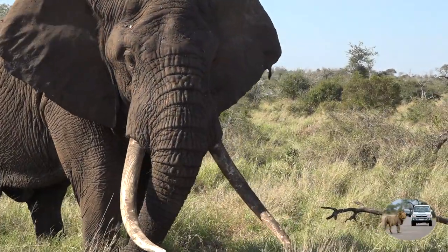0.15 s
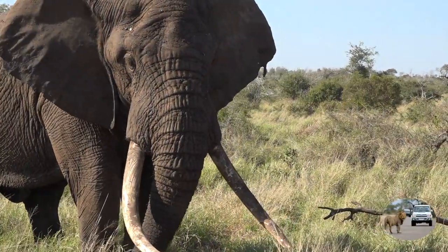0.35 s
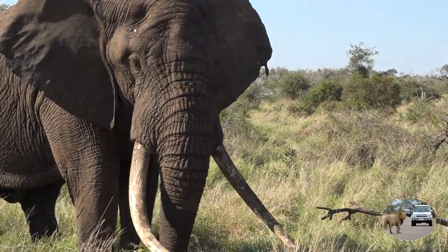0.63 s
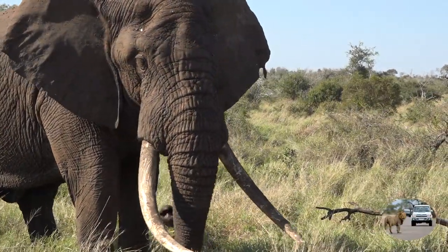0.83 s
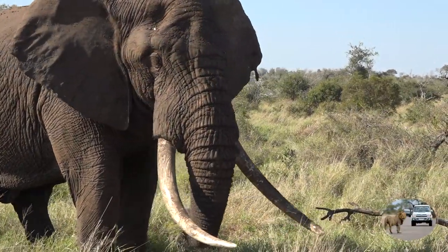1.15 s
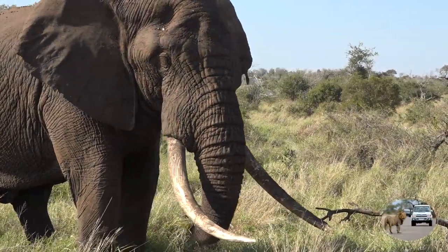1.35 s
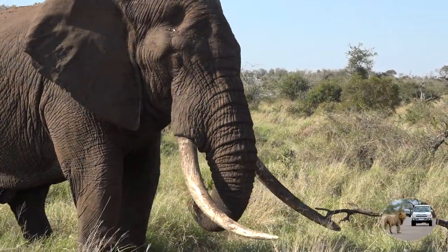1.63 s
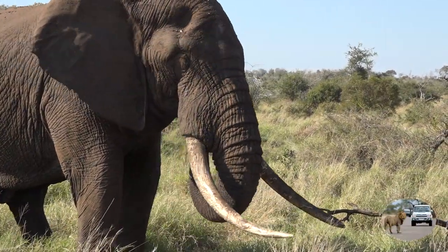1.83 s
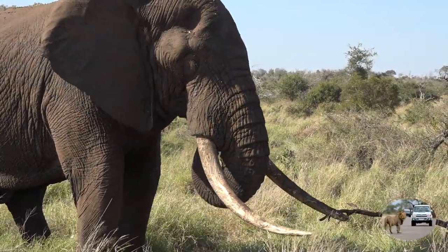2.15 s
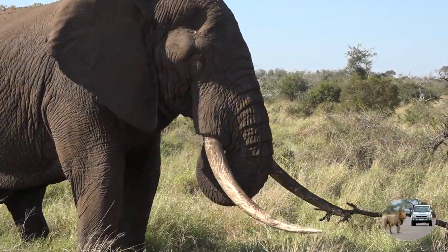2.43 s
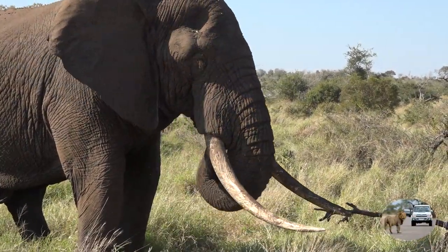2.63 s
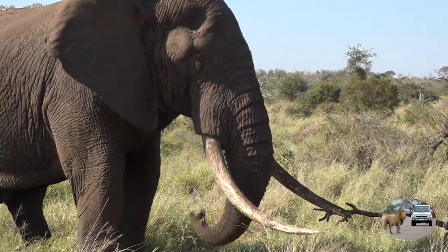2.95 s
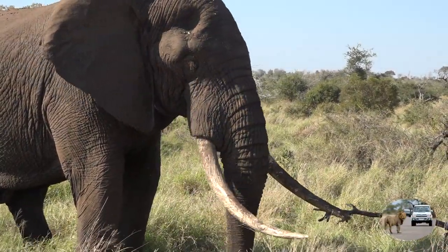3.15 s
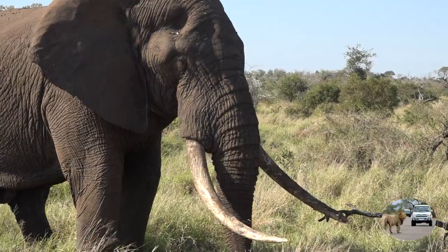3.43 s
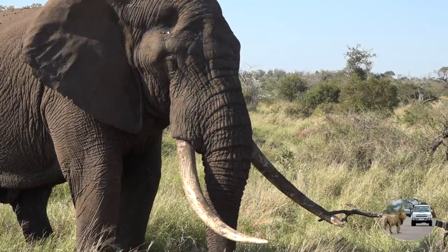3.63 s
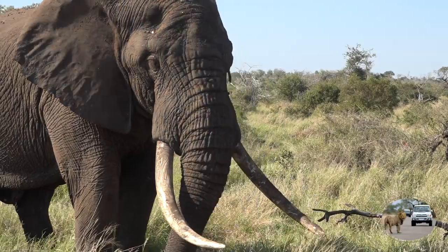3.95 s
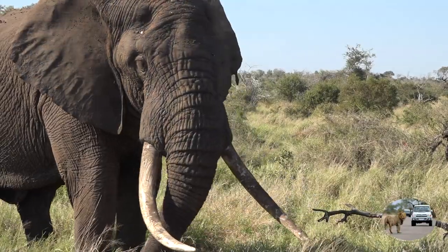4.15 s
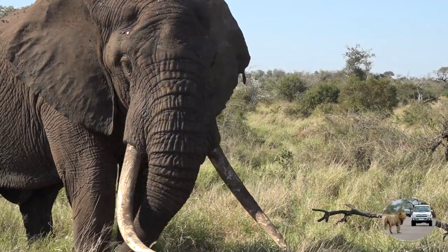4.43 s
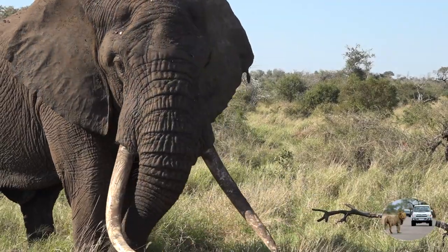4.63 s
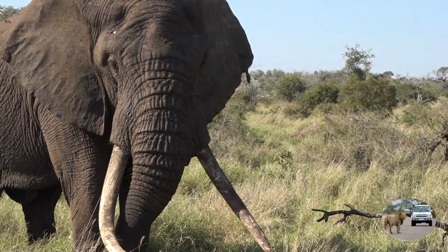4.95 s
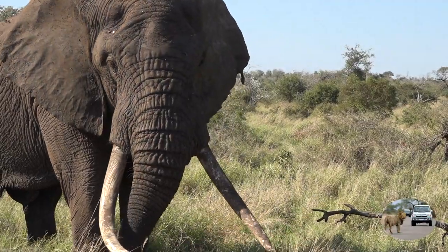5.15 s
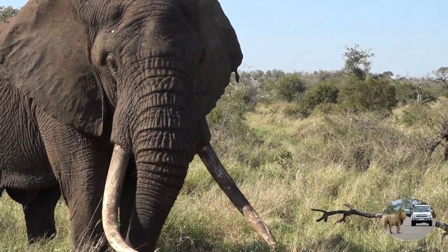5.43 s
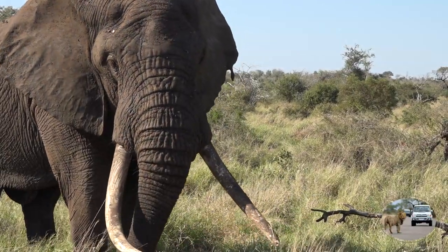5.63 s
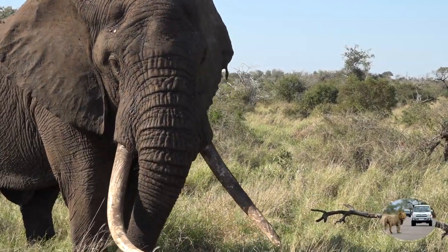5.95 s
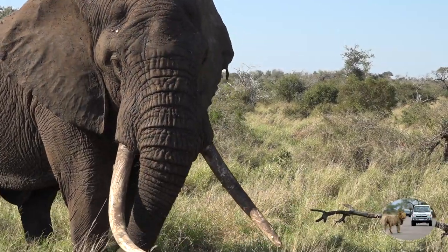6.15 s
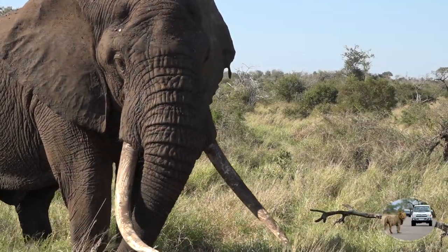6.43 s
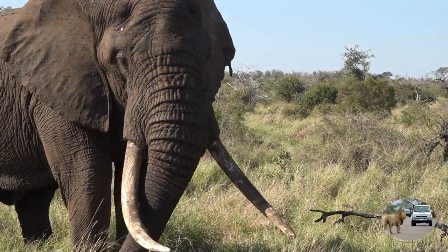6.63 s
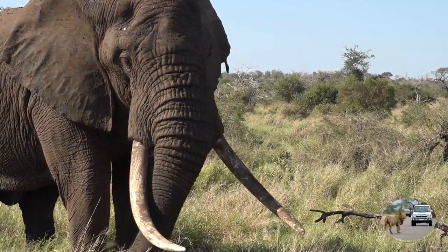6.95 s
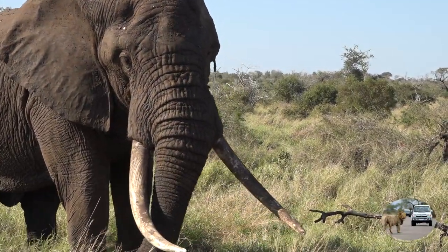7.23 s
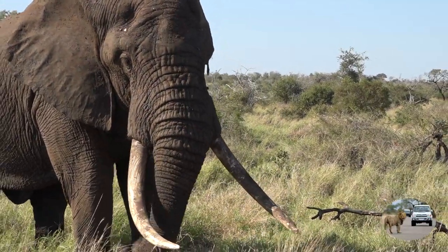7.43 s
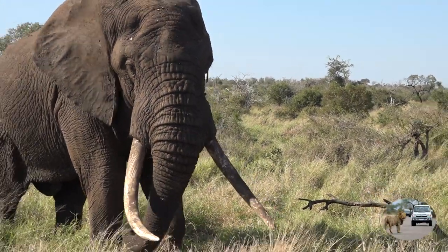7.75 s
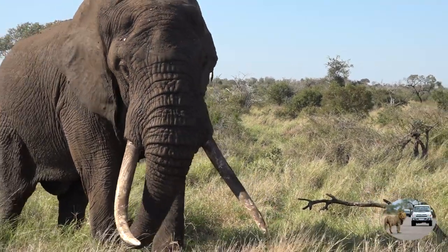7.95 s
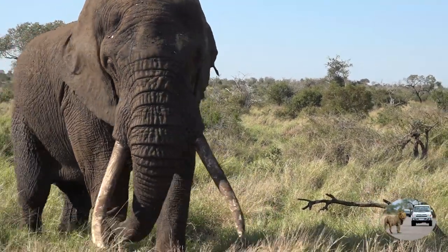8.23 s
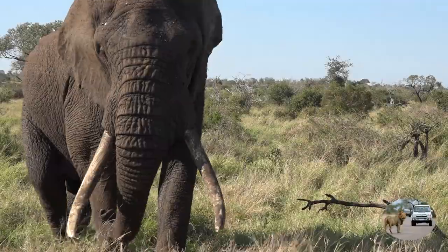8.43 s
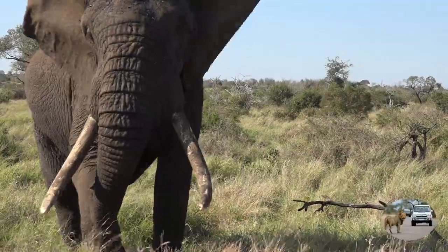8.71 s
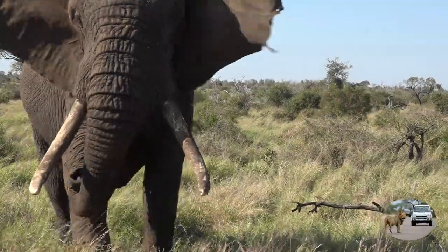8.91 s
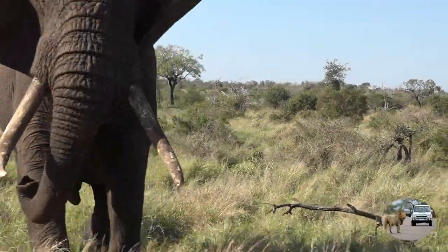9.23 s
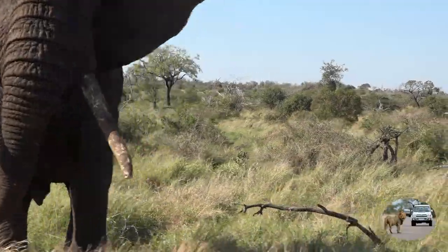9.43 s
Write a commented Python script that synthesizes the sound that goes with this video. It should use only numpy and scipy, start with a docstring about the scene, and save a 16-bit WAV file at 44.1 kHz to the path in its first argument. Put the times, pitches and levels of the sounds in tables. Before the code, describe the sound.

A vehicle's engine idles close by in open grassland with a low, uneven throb and a light metallic clatter. An elephant swishes softly through dry grass, with a few faint thuds early on. Near the end the rustling grows louder and stalks snap, then the engine revs hard, climbing in pitch with a rasping growl and low jolts as the vehicle moves off.

```python
"""Open grassland: a vehicle stands with its eight-cylinder engine idling, then revs hard to pull away.
A big animal swishes through dry grass nearby, with snapping stalks and a few thuds over a faint hiss.
The engine's uneven firings clatter in the block, growl in the exhaust pipe and boom in the body.
Under load the intake hums, a rasp opens up and the body jolts as the vehicle moves off."""
import sys
import numpy as np
from scipy import signal
from scipy.fft import rfft, irfft, next_fast_len
from scipy.io import wavfile

SR = 44100
rng = np.random.default_rng(int(sys.argv[2]) if len(sys.argv) > 2 else 0)


def waveform_to_disk(signal):
    """Save audio, clipped to [-1, 1], as 16-bit WAV at the path in sys.argv[1]."""
    frames = np.transpose(np.atleast_2d(signal))
    scaled = np.clip(frames, -1, 1) * 32767
    samples = np.round(scaled).astype(np.int16)
    wavfile.write(sys.argv[1], SR, samples)


N = 422478


def from_db(db):
    """Decibels to gain."""
    return 10 ** (np.asarray(db) / 20)


def rms_one(x):
    """Normalise to rms 1."""
    return x / np.sqrt(np.mean(x ** 2) + 1e-20)


def automation(rows):
    """One curve for each column after the time, one value a sample."""
    times, *columns = np.transpose(rows)
    return [np.interp(np.arange(N) / SR, times, column) for column in columns]


def ride(fader, load_db):
    """Level in dB of a fader (idle level [dB], load share) that rides the engine load."""
    idle_db, share = fader
    return idle_db + share * load_db


def swells(rows):
    """Envelope of swells (time [s], peak [dB], 20 dB rise [s], 20 dB fall [s]), added as powers."""
    t = np.arange(0, N + 64, 64) / SR
    power = sum(from_db(db - 20 * np.maximum((s - t) / rise, (t - s) / fall)) ** 2
                for s, db, rise, fall in rows)
    return np.interp(np.arange(N) / SR, t, np.sqrt(power))


def resonance(x, hz, width_hz):
    """Two-pole band-pass with gain 1 at its peak."""
    r = np.exp(-np.pi * width_hz / SR)
    poles = [1, -2 * r * np.cos(2 * np.pi * hz / SR), r * r]
    return signal.lfilter([(1 - r * r) / 2, 0, (r * r - 1) / 2], poles, x + 1e-18)


def steep_resonance(x, hz, width_hz):
    """Two band-pass stages in series, each width_hz wide."""
    return resonance(resonance(x, hz, width_hz), hz, width_hz)


# stereo image of grass and block: (frequency [Hz], left-right likeness [0..1])
STEREO_LIKENESS = [(200, 1), (1400, 1), (3100, 0.82), (6800, 0.93), (15000, 0.81)]

def coloured(mid_side, eq, low_hz=10, high_hz=20000):
    """EQ and band-limit a mid/side pair, then spread it to left and right at rms 1."""
    size = next_fast_len(N)
    hz = np.maximum(np.fft.rfftfreq(size, 1 / SR), 1)

    def curve(points):
        point_hz, values = np.transpose(points)
        return np.interp(np.log(hz), np.log(point_hz), values)

    gain = from_db(curve(eq)) / np.sqrt((1 + (low_hz / hz) ** 12) * (1 + (hz / high_hz) ** 12))
    alike = curve(STEREO_LIKENESS)
    mid, side = rfft(mid_side, size)
    stereo = np.sqrt(1 + alike) * mid + np.sqrt(1 - alike) * side * [[1], [-1]]
    return rms_one(irfft(gain * stereo, size)[:, :N])


def open_air():
    """A faint, wide bed of hiss."""
    return from_db(-62.5) * rms_one(resonance(rng.standard_normal((2, N)), hz=5300, width_hz=19000))


# thuds, some layered: (time [s], level [dB], pitch [Hz], stage width [Hz], 60 dB decay [s])
THUD_HITS = [(0.091, -38.5, 880, 250, 0.24), (0.967, -38, 220, 80, 0.2), (0.971, -41, 650, 400, 0.13),
             (0.972, -43, 1100, 500, 0.12), (0.972, -55, 2200, 900, 0.08), (1.1, -44, 1100, 600, 0.12),
             (1.1, -41, 450, 200, 0.05), (7.429, -46, 4700, 1800, 0.035), (7.484, -45, 4300, 3500, 0.05),
             (7.973, -38, 1090, 900, 0.07), (7.974, -38, 3600, 1600, 0.06), (8.515, -44, 3900, 2500, 0.06),
             (8.697, -41, 2800, 1800, .03), (8.915, -32, 4900, 3500, 0.035)]

def thuds():
    """Short puffs of noise, each dying away in one broad resonance."""
    t = np.arange(SR // 4) / SR
    out = np.zeros(N + len(t))
    for s, level_db, hz, width, t60 in THUD_HITS:
        puff = rms_one(steep_resonance(rng.standard_normal(len(t)), hz, width))
        out[round(s * SR):][:len(t)] += from_db(level_db - 60 * t / t60) * puff
    return out[:N]


# stalks breaking: (time [s], relative level [dB])
STALK_SNAPS = [(4.9594, -47), (6.0661, -42), (7.4295, -49), (7.4829, -39), (7.4885, -42), (7.7473, -35),
               (7.811, -29), (7.9543, -36), (7.9758, -29), (8.121, -37), (8.4941, -30), (8.517, -34),
               (8.699, -37), (8.8, -36), (8.841, -30), (8.9162, -33), (8.9894, -23), (9.154, -36)]

def snap_envelope():
    """Each breaking stalk is an instant spike with a 2 ms decay."""
    spikes = np.zeros(N)
    for s, db in STALK_SNAPS:
        spikes[round(s * SR)] = from_db(db - 10)
    return signal.lfilter([1], [1, -np.exp(-1 / (.002 * SR))], spikes)


# tone of dry grass: (frequency [Hz], EQ gain [dB])
GRASS_EQ = [(1470, 0), (2500, -1), (2980, -5), (3480, -1), (4600, -3.5), (6300, 3), (7700, -5.5),
            (9000, -3), (10600, -4.5), (12300, -10), (14800, -11.5), (15800, -20)]
# moves through the grass:
# (time [s], peak [dB], 20 dB rise [s], 20 dB fall [s], dull band trim [dB], crisp band trim [dB])
GRASS_SWISHES = [(.1, -50.5, 4.9, 0.92, -1, -1.5), (.32, -54, .08, .5, 1, -1),
                 (.51, -50, 1.1, 0.18, -0.5, 1.5), (1.28, -68.5, 0.48, 1, 18, 0),
                 (1.52, -65, .05, 0.11, 0, 9), (1.91, -68, .05, .12, 0, 10), (1.96, -60, 0.34, 0.42, 0, 2),
                 (2.5, -64, .1, .2, 0, 2), (2.58, -70, .04, .1, 0, 7), (3.34, -60, .25, 0.4, 0, 1),
                 (4.76, -55, 0.096, .4, 0, 0), (4.86, -54.5, 0.54, 0.55, -5, 2.5),
                 (5.31, -51.5, 0.42, 0.98, -4, 2.5), (5.64, -61, 0.27, .3, -5, 7),
                 (5.79, -48.5, 0.49, 0.31, -3, 0), (6.03, -51, 0.54, 0.34, -3, 0),
                 (6.61, -68, .04, .1, 2, 8), (6.67, -63, 0.55, 0.21, 0, 0), (7.44, -59, .06, .2, 3, 0),
                 (7.52, -49.5, 0.18, 0.28, 1.5, -1.5), (7.66, -52.5, 0.16, .12, -4, 0),
                 (7.755, -43.5, 0.02, 0.27, -10, 0), (7.81, -41.5, 0.087, 0.14, -6, 2),
                 (7.85, -45, .15, 0.083, -6, 0), (7.98, -39, 0.083, 0.26, -2, -2),
                 (8.15, -46.5, .2, 0.18, 3.5, 0), (8.39, -42.5, 0.38, 0.55, 2.5, 0),
                 (8.699, -47, 0.09, 0.084, -8, 0), (8.75, -34.5, 0.03, 0.19, 1.5, -0.5),
                 (8.77, -44, 0.074, 0.15, -4, 4), (8.85, -38.5, 0.059, 0.32, 0, 1),
                 (8.89, -39.5, 0.14, 0.3, 1, -5), (8.975, -33, 0.22, 0.11, -6, 0),
                 (9.1, -45, 0.092, 0.055, -4, -12), (9.45, -43.5, 0.93, 1.3, -6, -2)]
STALKS_PER_S, CRACKLE_DB = 1200, -5
FLICKER_HZ, FLICKER_DB = 12, 1.4
DULL_HZ, CRISP_HZ = 4470, 8220   # crossovers
RUSTLE_FADER = (-65.5, 1)

def grass(load_db):
    """Dry stalks brush past in clumps of hiss and crackle; a steady rustle rises with the engine load."""
    stalks = rng.random((2, N)) < STALKS_PER_S / SR
    strength = from_db(4 * np.minimum(rng.exponential(1, (2, N)), 4))
    crackle = rms_one(stalks * strength * rng.choice([-1, 1], (2, N)))
    swish = coloured(rng.standard_normal((2, N)) + from_db(CRACKLE_DB) * crackle, GRASS_EQ)
    flicker = rms_one(resonance(rng.standard_normal((3, N)), FLICKER_HZ, 2 * FLICKER_HZ))
    rustle, snaps = from_db(ride(RUSTLE_FADER, load_db)), snap_envelope()
    times, peak_db, rise, fall, dull_db, crisp_db = np.transpose(GRASS_SWISHES)
    bands = [("low", DULL_HZ, dull_db), ("band", [DULL_HZ, CRISP_HZ], 0), ("high", CRISP_HZ, crisp_db)]
    out = 0
    for clumps, (kind, edges_hz, trim_db) in zip(from_db(FLICKER_DB * flicker), bands):
        band = signal.sosfilt(signal.butter(4, edges_hz, kind, fs=SR, output="sos"), swish)
        brushing = clumps * swells(zip(times, peak_db + trim_db, rise, fall))
        out = out + (np.hypot(brushing, rustle) + snaps) * band
    return out


# bands of the block that speak under load:
# (centre [Hz], stage width [Hz], idle level [dB], load share [dB/dB], slope past the knee [dB/octave])
RASP_BANDS = [(144, 44, -54, 2.1, -53), (181, 17, -67.5, 1.51, 14), (997, 14, -82.5, 1.87, 4),
              (1412, 14, -84, 1.76, 5), (214.5, 41, -58, 2.1, -53), (2900, 450, -87.5, 1.93, 6),
              (449, 75, -64.5, 1.71, -23), (298, 116, -60.5, 1.72, -22), (1750, 220, -75.5, 1.55, -4),
              (1130, 500, -79.5, 1.7, 14.5), (2180, 180, -76.5, 1.82, -16)]
RASP_KNEE_PER_S = 82.4

def rasp(per_s, load_db):
    """Resonant noise that opens up with load and shifts colour once the firing rate passes the knee."""
    noise = rng.standard_normal(N)
    octaves = np.log2(np.maximum(per_s / RASP_KNEE_PER_S, 1))
    return sum(from_db(db + share * load_db + slope * octaves) * rms_one(steep_resonance(noise, hz, width))
               for hz, width, db, share, slope in RASP_BANDS)


# throttle hum: (multiple of the firing rate, resonance [Hz], width [Hz], peak level at idle load [dB])
INTAKE_TONES = [(1, 90.5, 17, -43), (1.5, 181, 15, -50), (1.625, 182.4, 10.6, -46.5), (2, 230, 50, -59),
                (3, 399.6, 61, -56)]

def intake(firings, per_s, load_db):
    """The open throttle hums in tones that track the revs and bloom at the air box's resonances."""
    out = 0
    for multiple, hz, width, db in INTAKE_TONES:
        bloom = 1 / (1 + ((multiple * per_s - hz) / width) ** 2) ** 2
        tone = np.sqrt(2) * np.sin(2 * np.pi * multiple * firings)
        out = out + from_db(db + load_db) * bloom * tone
    return out


# the engine's lope, a row per cylinder in firing order: (body accent [dB], exhaust accent [dB],
# exhaust delay [firings], drone accent [dB], clatter accent [dB], tick accent [dB])
CYLINDER_ACCENTS = [(0.5, 4.4, 0.04, 1, 6, 3), (0.75, -0.5, 0.2, 4, 6, 4), (-0.25, -1.6, 0.18, 2, 6, 5),
                    (-3.0, 1.3, 0.2, 2, 4, 7), (0.1, 1.7, 0.22, 3, 5, 3), (2.7, -4.9, 0.47, 5, 4, 2),
                    (-0.6, -1.8, 0.09, 4, 6, 1.5), (-0.25, -1.7, 0.03, 6, 3, 3)]
BODY_ACCENT, EXHAUST_ACCENT, EXHAUST_DELAY, *BLOCK_ACCENTS = np.transpose(CYLINDER_ACCENTS)

def pulses(firings, per_s, accent_db, delay, rough_db):
    """A click per firing, sized by cylinder and by chance; the harmonics hold their level at any revs."""
    count = np.arange(-1, int(firings[-1]))
    cylinder = count % 8
    onsets = np.searchsorted(firings, count + delay[cylinder])
    clicks = np.zeros(N + 1)
    clicks[onsets] = from_db(accent_db[cylinder] + rough_db * rng.standard_normal(len(count)))
    return clicks[:N] * SR / per_s / np.sqrt(2)


# ringing parts of the block; each swings once and three times in eight firings: (pitch [Hz], width [Hz],
# boost [dB], slow swing phase [firings], slow swing [dB], fast swing phase [firings], fast swing [dB])
BLOCK_MODES = [(341, 9.6, 4.5, 4.9, 7, 2.6, 2.5), (399, 6.8, 6.5, 6.2, 2, 1.5, -2),
               (485, 73, 2.5, 1.1, 0, 0, 0), (575, 3.1, 9, 3.8, 4, -1.5, -2.5),
               (676.6, 15, 10, 6.66, 4.5, -0.6, 2.5), (743, 14, 7.5, 7.4, 0, 0.5, 6),
               (792, 9, 5.5, 4.5, 5.5, 1.5, 2), (889, 43, 3.5, 7.4, 3, 1.1, 1.5),
               (940, 11, 8.5, 0.56, -0.5, .5, 2.5), (1021, 33, 5, 5.8, 2, 0.5, 1),
               (1159, 14, 5, 7.2, 4, 1.5, 7), (1219, 22, 8.5, 7.4, 0, 1.2, -3.5),
               (1262, 8, 7, 0.45, 1.5, 4.5, 1.5), (1338, 17, 5.5, 7.9, 4, 0.8, 2),
               (1410, 10.5, 4.5, 6, 3, 0.7, 4.5), (1446, 18, 6.5, 5.7, 1, 1.54, 4.5),
               (1520, 33, 4.5, 5.1, 0.5, 2, 3.5), (1663, 25, 5, 1.25, 4, 1, 3),
               (1711, 24, 5.5, 2.3, 2, 2.6, 3.5), (1850, 20, 3.5, 1.6, 4, 0, 4),
               (2246, 75, 7, 3.8, 3.5, 0, 0.5), (3162, 77, 6, 3.8, 1.5, 0, 0),
               (3775, 55, 7.5, 0.48, 0.8, 0, -2)]
RING_FADE_PER_DB = 0.018   # share of the boost and swing lost per dB of load

def block_rings(drive, firings, load_db, low_hz, high_hz):
    """Metal parts ring in turn as the cylinders fire; load drowns them."""
    clarity = np.clip(1 - RING_FADE_PER_DB * load_db, 0, 1)
    out = 0
    for hz, width, boost_db, slow_at, slow_db, fast_at, fast_db in BLOCK_MODES:
        if low_hz < hz < high_hz:
            slow = slow_db * np.cos(np.pi * (firings - slow_at) / 4)
            fast = fast_db * np.cos(3 * np.pi * (firings - fast_at) / 4)
            out = out + (from_db(clarity * (boost_db + slow + fast)) - 1) * resonance(drive, hz, width)
    return out


# tone of the block: (frequency [Hz], EQ gain [dB])
BLOCK_EQ = [(150, 14), (250, -1.5), (400, -0.5), (550, -7), (800, -10.5), (1100, -14.5), (1750, -13),
            (2030, -22), (3300, -24.5), (3600, -31), (7000, -36), (15800, -104)]
# the clatter sinks and swells as the idle settles: (time [s], level [dB])
CLATTER_TRIM = [(0, 2), (.3, -2), (.5, -1), (1.05, 0), (1.3, 0.5), (1.7, 1), (2.0, 0.5), (9.58, -0.5)]
DRONE_FADER, CLATTER_FADER = (-47.5, 0.83), (-46.5, 0.68)
SWELL_SHARE = 0.58   # part of each accent that survives the smoothing mass of the block
SWELL_LAG = 0.81   # firings from the pulse to the peak of the clatter
KNOCK_DB, TICK_DB, TICK_FROM_HZ = -5, -7.5, 1950

def block(firings, per_s, load_db):
    """Combustion noise swells at each firing as drone, clatter and tick; knocks strike the lower rings."""
    turn = firings - SWELL_LAG + .5
    swell = SWELL_SHARE * np.sin(np.pi * turn) ** 2
    cylinder = np.floor(turn).astype(int) % 8
    drone_db = ride(DRONE_FADER, load_db)
    clatter_db = ride(CLATTER_FADER, load_db) + automation(CLATTER_TRIM)[0]
    tick_db = clatter_db + TICK_DB + 0.11 * (clatter_db - np.median(clatter_db))   # brighter under load
    bands = [(200, 800, drone_db), (800, TICK_FROM_HZ, clatter_db), (TICK_FROM_HZ, 20000, tick_db)]
    knocks = pulses(firings, per_s, BLOCK_ACCENTS[1], np.full(8, SWELL_LAG), rough_db=1.0)
    knocks = from_db(KNOCK_DB) * rms_one(knocks * np.sqrt(per_s)) * [[1], [0]]   # mid only
    out = 0
    for accent_db, (low, high, level_db) in zip(BLOCK_ACCENTS, bands):
        noise = from_db(swell * accent_db[cylinder]) * rng.standard_normal((2, N))
        drive = noise + knocks * noise.std() * (low < TICK_FROM_HZ)
        rings = block_rings(drive, firings, load_db, low, high)
        out = out + from_db(level_db) * coloured(noise + rings, BLOCK_EQ, low, high)
    return out


# voice of the exhaust pipe: (pitch [Hz], first stage width [Hz], relative level [dB],
# load share [dB/dB], throb peak [firings], throb at idle [dB], throb sharpness)
PIPE_MODES = [(112, 15, -8, -.62, 0, 0, 1), (131, 16, -8, -.05, .5, 3.5, 1.5),
              (149, 12, -5, -.1, .7, 8.5, 1.0), (179, 11, -8, .35, 3.3, 11, 6),
              (196, 22, -8, -.05, 3.3, 6, 6), (240, 60, -12.5, .08, 0, 0, 1)]
GROWL_FADER, GAS_DB = (-42.5, 1.16), -8

def exhaust(firings, per_s, load_db):
    """Uneven pipe lengths delay each cylinder's pulse; pulses and turbulent gas ring the pipe."""
    clarity = np.clip(1 - 2 * RING_FADE_PER_DB * load_db, 0, 1)   # load flattens the throb

    def pipe(drive):
        out = 0
        for k, (hz, width, db, share, peak_at, throb_db, sharpness) in enumerate(PIPE_MODES):
            throb = np.exp(sharpness * (np.cos(np.pi * (firings - peak_at) / 4) - 1))   # once in eight
            gain = from_db(db + share * load_db + clarity * throb_db * throb)
            out = out + (-1) ** k * gain * resonance(resonance(drive, hz, width), hz, 3 * width)
        return rms_one(out)

    beats = pipe(pulses(firings, per_s, EXHAUST_ACCENT, EXHAUST_DELAY, rough_db=1.3))
    mid, side = pipe(rng.standard_normal((2, N)))
    gas = mid + 0.16 * side * [[1], [-1]]
    return from_db(ride(GROWL_FADER, load_db)) * rms_one(beats + from_db(GAS_DB) * gas)


# low end of the vehicle's body: (pitch [Hz], stage width [Hz], gain [dB], left minus right [dB])
BODY_MODES = [(27.3, 6, -24.5, -8), (33.8, 9.5, -29.5, -8.5), (47.7, 7.4, -15.5, -9), (71.5, 10, -43, -3)]
# pressure pulses reaching the body: (time [s], level below the split [dB], level above it [dB])
BODY_DRIVE = [(0, 1.5, -3), (.25, 3.5, -1.5), (1.1, 2.5, -6), (1.3, -2.5, -5.5), (4, -1.6, -1),
              (8.3, 0.5, -2), (8.38, 13, 5), (8.42, 15, 5.5), (8.47, -9, -7), (8.56, 19, 7), (8.64, 3, -18),
              (9.58, 17, 8)]
# jolts as the vehicle moves off: (time [s], level before panning [dB])
BODY_JOLTS = [(8.7, -19.5), (9.0, -28.5), (9.3, -25.5), (9.53, -25)]
JOLT_RISE_S, JOLT_FALL_S = 0.33, 0.15
SHAKE_FADER, BODY_SPLIT_HZ = (-44, .62), 40

def body_boom(firings, per_s, load_db):
    """Pulses ring the body's low modes over an irregular shaking, all heavier on the right."""
    drive = pulses(firings, per_s, BODY_ACCENT, delay=np.zeros(8), rough_db=0.6)
    jolts = swells([(s, db, JOLT_RISE_S, JOLT_FALL_S) for s, db in BODY_JOLTS])
    shake_db = ride(SHAKE_FADER, load_db)
    shake = rms_one(resonance(resonance(rng.standard_normal(N), 45, 52), 45, 24))
    wide_shake = rms_one(resonance(rng.standard_normal((2, N)), 46.4, 18.6))
    out = np.hypot(from_db(shake_db), jolts) * shake * from_db([[-4.5], [3]])
    out += from_db(shake_db - 1) * wide_shake
    low_db, high_db = automation(BODY_DRIVE)
    for hz, width, level_db, pan_db in BODY_MODES:
        drive_db = low_db if hz < BODY_SPLIT_HZ else high_db
        mode = steep_resonance(drive * from_db(drive_db), hz, width)
        out += from_db([[level_db + pan_db / 2], [level_db - pan_db / 2]]) * mode
    return out


# a fast idle that dips and settles, then the rev: (time [s], firing rate [1/s])
ENGINE_SPEED = [(0.0, 36.5), (0.9, 37.2), (1.2, 35.31), (1.5, 35.29), (1.9, 36.15), (8.2, 36.3),
                (8.452, 48.6), (8.56, 57.9), (8.72, 80.5), (8.81, 87.5), (8.9, 93.4), (9.01, 99.4),
                (9.29, 106), (9.58, 118)]
# how hard the engine works: (time [s], load over idle [dB])
ENGINE_LOAD = [(0, 0), (7.8, 0), (8.2, 2), (8.4, 4), (8.55, 7.5), (8.68, 10.5), (8.85, 16.5), (9.0, 19),
               (9.25, 19), (9.58, 21.5)]

def scene():
    """The mix: five engine layers on one firing clock, with grass, thuds and air behind them."""
    per_s, = automation(ENGINE_SPEED)
    load_db, = automation(ENGINE_LOAD)
    firings = np.cumsum(per_s) / SR - .03   # running count, starting just short of the first firing
    air = open_air()
    engine = body_boom(firings, per_s, load_db) + intake(firings, per_s, load_db)
    engine += exhaust(firings, per_s, load_db) + rasp(per_s, load_db) + block(firings, per_s, load_db)
    return engine + grass(load_db) + thuds() + air


CUTOFF_HZ = 15730

def record(dry):
    """The master leans slightly right and passes a steep high cut."""
    balance = from_db([[-.2], [.2]])
    high_cut = signal.ellip(12, .5, 70, CUTOFF_HZ, fs=SR, output="sos")
    return signal.sosfilt(high_cut, balance * dry)


dry = scene()
out = record(dry)
waveform_to_disk(out)
```